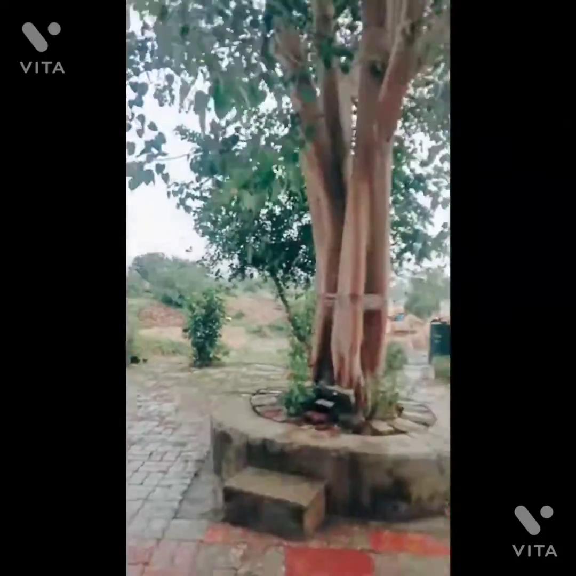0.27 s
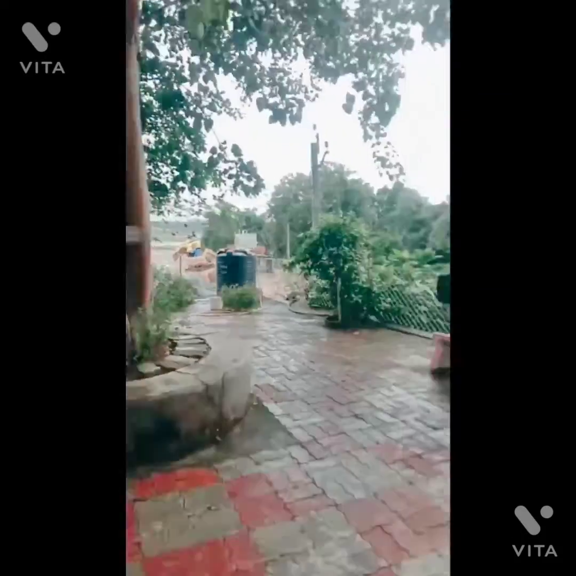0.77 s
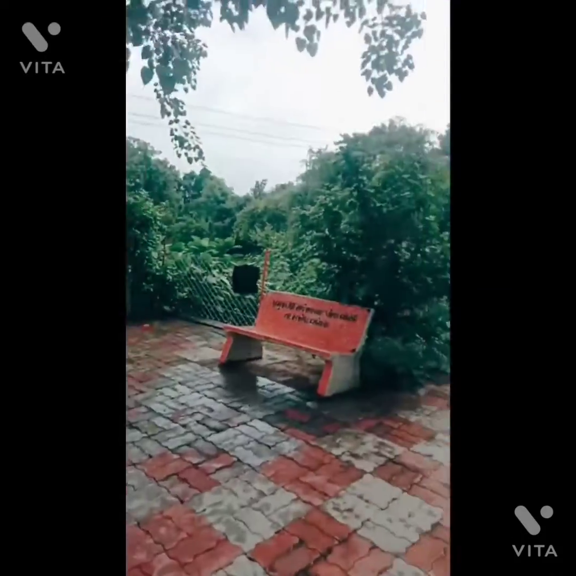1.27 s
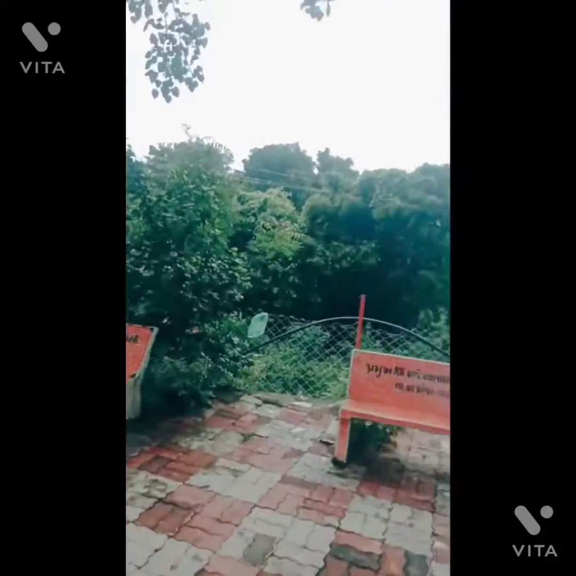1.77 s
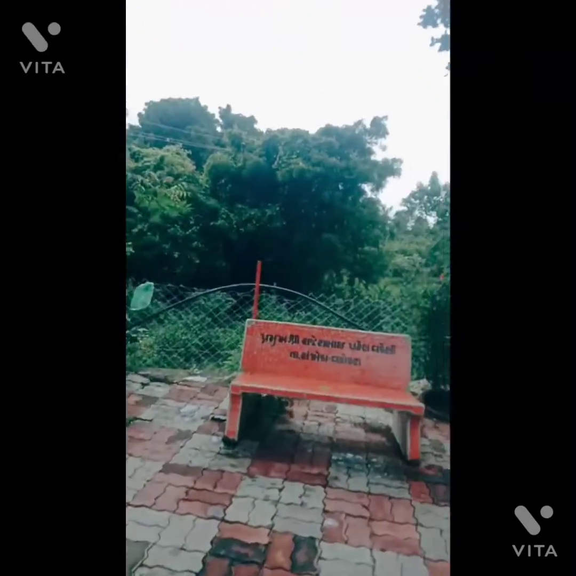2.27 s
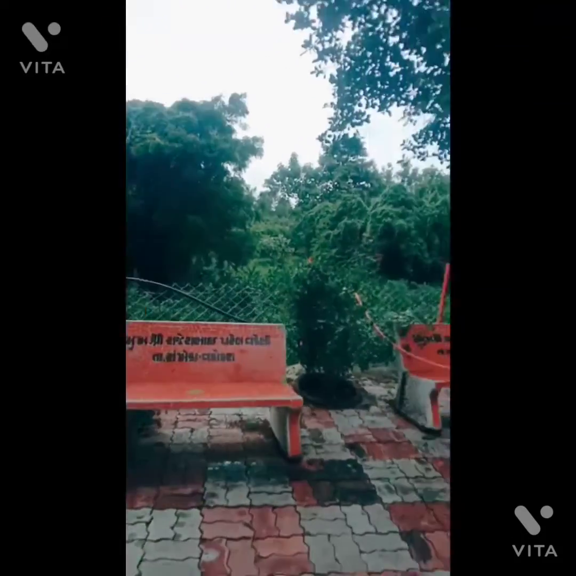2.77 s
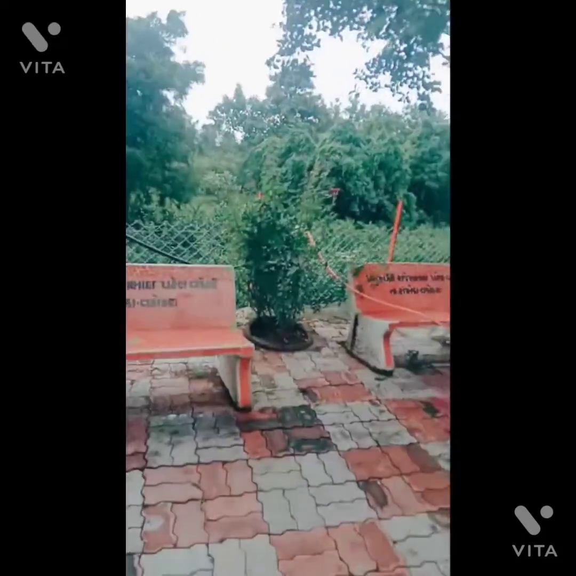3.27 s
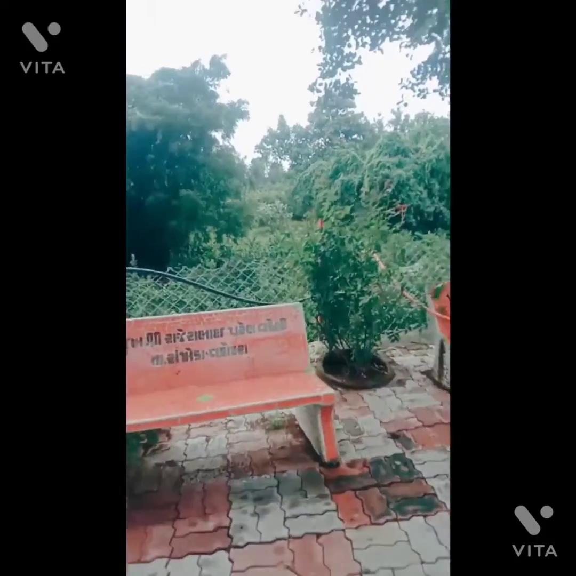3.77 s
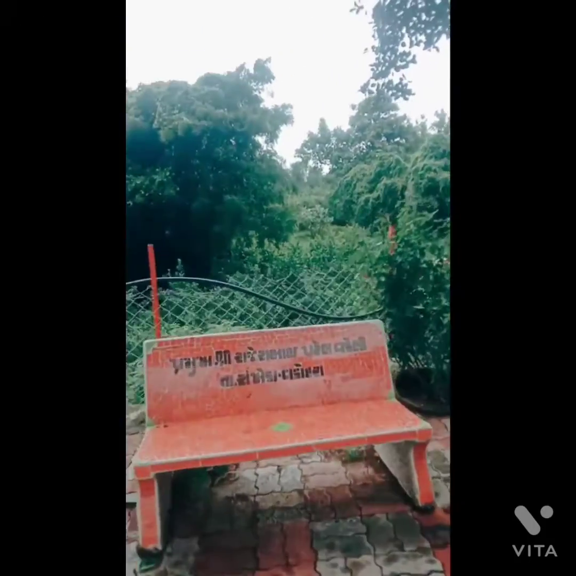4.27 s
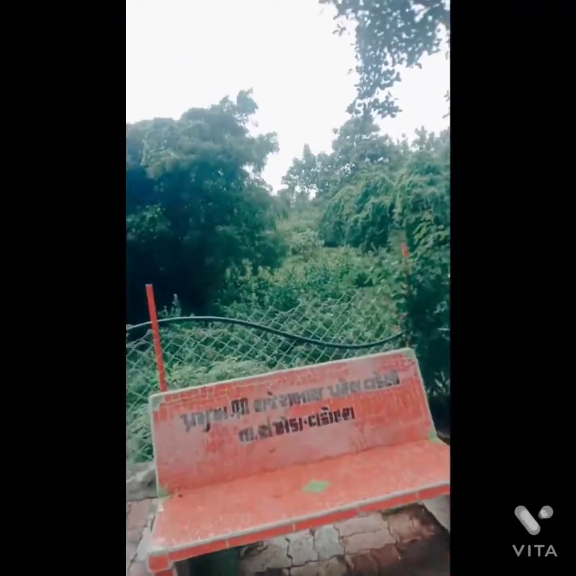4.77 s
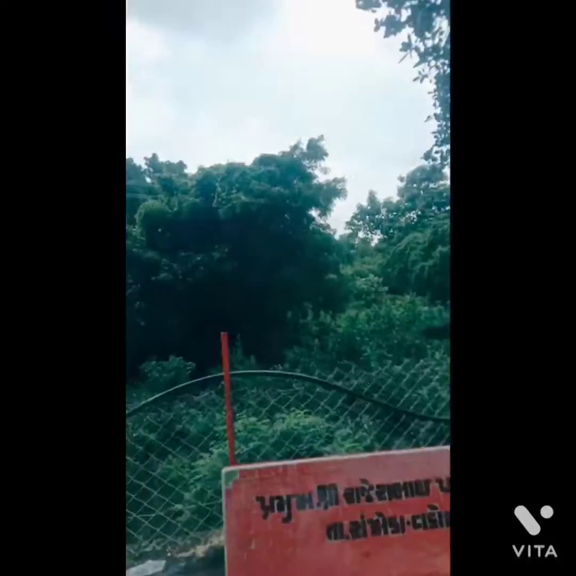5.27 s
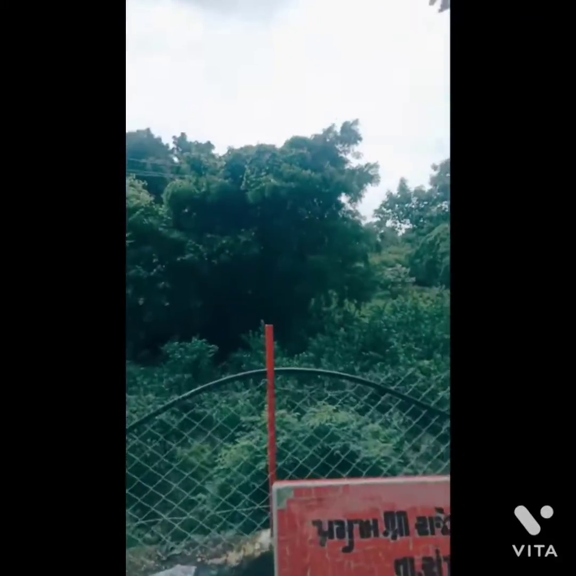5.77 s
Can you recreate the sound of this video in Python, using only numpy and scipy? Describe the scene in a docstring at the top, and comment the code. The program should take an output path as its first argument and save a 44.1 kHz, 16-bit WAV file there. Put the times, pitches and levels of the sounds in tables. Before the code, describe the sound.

A peacock gives five loud, arching cries outdoors, with faint small birds, a few shoe scuffs and light wind behind.

```python
"""Peacock in a paved garden

A peacock gives five loud two-part cries: a low note, a break upward, a long bright arch. Its syrinx buzzes
through throat and beak, and trunks and foliage scatter each cry. Small birds whistle and twitter farther off,
short rough bursts rustle and tick close by, and light wind bumps the microphone over a soft open-air hiss."""
import sys
import numpy as np
from scipy import signal
from scipy.fft import rfft, irfft, next_fast_len
from scipy.io import wavfile
from scipy.ndimage import uniform_filter1d, map_coordinates

SR = 44100
rng = np.random.default_rng(int(sys.argv[2]) if len(sys.argv) > 2 else 0)


def persist_wave(psi):
    """Save psi, clipped to +-1, as 16-bit WAV."""
    counts = np.round(np.clip(psi, -1, 1) * 32767).astype(np.int16)
    wavfile.write(sys.argv[1], SR, np.atleast_2d(counts).T)


N = 265746

# tone of the open-air hiss: freq_hz, gain_db
AIR_EQ = [(120, -43.5), (200, -2.5), (633, -8.5), (741, -8), (980, -10.5), (1270, -0.5), (1460, -9.5),
          (2270, -8.5), (3050, -21), (5720, -13), (6460, -29), (7180, -20), (8260, -35.5), (13000, -36)]
# tone of the wind rumble: freq_hz, gain_db
RUMBLE_EQ = [(12, -60), (20, -30), (64, -12.5), (93, -3.5), (125, -5.5), (179, -10.5), (278, -45.5),
             (400, -49.5), (520, -85.5), (880, -120)]
# eddies bumping the microphone: centre_s, pitch_hz, half_width_s, level_db
WIND_BUMPS = [(0.714, 88, 0.027, -38), (0.926, 92.7, 0.006, -27.5), (1.623, 112, 0.0099, -20),
              (1.691, 74.7, 0.017, -25), (1.847, 86, 0.016, -22.5), (2.25, 87.5, 0.0096, -28.5),
              (2.419, 78.6, 0.0091, -31), (2.84, 109, 0.013, -36)]
# short rough noise bursts, rustles and ticks close by: start_s, length_s, centre_hz, width_octaves, relative_db
RUSTLES = [(.01, .6, 330, .6, -56), (.2, .1, 610, .13, -39), (.205, .19, 5600, .17, -45),
           (.218, .15, 3300, .3, -48), (1.448, .04, 7300, .04, -56), (1.46, .055, 2620, .09, -40),
           (1.675, .05, 2350, .12, -38), (1.772, .025, 2230, .06, -42), (4.526, .05, 5500, .25, -57),
           (4.53, .05, 2500, .38, -49)]
# reverb decay of the far trees: freq_hz, t60_s
TREE_DECAY = [(500, 0.47), (1400, 1), (2400, 1), (3200, 0.7), (5500, 1), (9000, 0.89), (14000, 0.18)]
# tone of the reflections off nearby trunks and leaves: freq_hz, gain_db
FOLIAGE_EQ = [(700, -12.5), (1500, -5), (2500, -0.5), (5500, 3), (9000, -2.5)]
# small birds' whistles: start_s, length_s, start_hz, middle_hz, end_hz, relative_db
BIRD_WHISTLES = [(2.833, 0.36, 4090, 4090, 4120, -65), (2.985, 0.84, 4740, 4705, 4610, -68),
                 (4.251, 0.078, 6200, 5480, 5100, -61), (4.621, 0.16, 4432, 5200, 5060, -57.5),
                 (4.94, 0.058, 4010, 3700, 3260, -59.5), (5, 0.072, 4200, 4030, 3770, -59.5),
                 (5.142, 0.062, 3925, 3630, 3380, -57.5), (5.345, 0.048, 5900, 5832, 5600, -57.5),
                 (5.698, 0.013, 2420, 2740, 2320, -49), (5.992, 0.0225, 3580, 3730, 4100, -52)]
# runs of twittering: start_s, end_s, relative_db
TWITTER_RUNS = [(2.035, 2.28, -53), (5.421, 6.03, -54.5)]
# tone of one chip in a run: freq_hz, gain_db
CHIP_EQ = [(3400, 3), (4000, 3.5), (4400, -13), (4950, 7), (5800, -2.5), (6450, -16.5), (7050, 5),
           (7700, -13)]
# resonances of the peacock's windpipe: freq_hz, gain_db
THROAT_EQ = [(1800, 6), (1950, 7), (2200, 9.5), (2360, -11.5), (2520, 5.5), (3150, -4), (3900, -4.5),
             (4400, -8.5)]
# resonances of its open beak: freq_hz, gain_db
BEAK_EQ = [(4400, -9), (4750, -13.5), (5500, -8.5), (6300, -9), (6900, -16.5), (7900, -16.5), (8700, -25),
           (10300, -29), (12000, -41), (15000, -59.5)]
# voice envelopes through the low note (the wail is the octave, nasal the mid partials, brass the highs):
# position_share, fundamental_db, wail_db, nasal_db, brass_db
LOW_NOTE_SHAPE = [(0, -56.5, -44, -62.5, -65), (.25, -48, -34.5, -45.5, -55.5), (.6, -45.5, -34, -47, -49),
                  (.9, -45.5, -35, -43.5, -52)]
# voice envelopes through the arch: position_share, fundamental_db, wail_db, nasal_db, brass_db
ARCH_SHAPE = [(.04, -39.5, -28.5, -55, -50.5), (.16, -38, -26, -44, -38), (.29, -38, -32, -45.5, -39),
              (.43, -37.5, -29.5, -42.5, -37), (.6, -40.5, -25.5, -44.5, -39.5),
              (.74, -43, -27.5, -54, -46.5), (.87, -44.5, -33, -43, -48), (1, -56.5, -35.5, -41.5, -58)]
# the cries, with trims on those envelopes: start_s, break_s, end_s, low_hz, crest_hz, settle_s,
# low_fundamental_db, arch_fundamental_db, nasal_db, brass_db,
# wail_low_db, wail_rise_db, wail_crest_db, wail_fall_db
PEACOCK_CRIES = [(-.28, -0.153, 0.37, 646, 783.8, .046, 0, -4, -.5, -1.5, 0, 1, -12.5, .5),
                 (0.609, .758, 1.203, 644.8, 788, 0.057, 7, -5, -2, -2, 1.5, 4.5, 0.5, 3),
                 (1.439, 1.614, 2.04, 650.3, 792.3, .038, -4, -1, -0.5, 0.5, 0, -4, 0.5, -3),
                 (2.31, 2.473, 2.953, 652.5, 789.3, 0.051, -0.5, 0, -0.5, 0, -2.5, 1.5, 1.5, 0),
                 (3.344, 3.503, 4.052, 646, 786, 0.047, 7, 2, 0.5, 1, 2, -2, -8.5, -1.5)]


def amp(db):
    """Decibels to gain."""
    return 10 ** (np.asarray(db) / 20)


def unit(x):
    """Scale to rms 1."""
    return x / np.sqrt(np.mean(x ** 2) + 1e-20)


def along(points, hz):
    """Read a curve of (freq_hz, value) points on a log axis."""
    freqs, values = np.transpose(points)
    return np.interp(np.log(hz + 1), np.log(freqs + 1), values)


def wobble(rate, size):
    """Smooth random modulation, rate knots a second."""
    return map_coordinates(rng.standard_normal(int(size * rate / SR) + 4), [np.arange(size) * rate / SR])


def filtered(x, response):
    """Zero-phase EQ; response gives the gain at each frequency."""
    padded = next_fast_len(len(x) + 8192)
    return irfft(rfft(x, padded) * response(np.fft.rfftfreq(padded, 1 / SR)), padded)[:len(x)]


def noise(response, size):
    """Coloured noise of rms 1."""
    return unit(filtered(rng.standard_normal(size), response))


def band(hz, octaves):
    """A bell-shaped response on a log axis."""
    return lambda f: np.exp(-.5 * (np.log2((f + 1) / hz) / octaves) ** 2)


def phase_of(hz):
    """The running phase of a pitch curve, in radians."""
    return 2 * np.pi * np.cumsum(hz) / SR


def add(track, start_s, sound):
    """Mix a sound into the track."""
    part = track[max(round(start_s * SR), 0):][:len(sound)]
    part += sound[:len(part)]


def patchy(x, depth_db):
    """Give a steady noise movement with random gain patches, some 400 Hz by 100 ms."""
    spectrum = signal.stft(x, nperseg=512)[2]
    patches = uniform_filter1d(rng.standard_normal(spectrum.shape), size=5, axis=0)
    patches = uniform_filter1d(patches, size=16, axis=1)
    return unit(signal.istft(spectrum * amp(depth_db * unit(patches)), nperseg=512)[1][:N])


def open_air(hiss_db=-54, drone_db=-61, drone_hz=1260, fizz_db=-77):
    """The bed: softly shifting hiss, a far narrow drone and a faint fizz at the very top."""
    hiss = patchy(noise(lambda f: amp(along(AIR_EQ, f)), N), depth_db=3.5)
    drone = amp(drone_db + 2.1 * wobble(10, N)) * noise(band(drone_hz, .037), N)
    return amp(hiss_db) * hiss + drone + amp(fizz_db) * noise(band(15200, .07), N)


def wind(breeze_db=-50.3, ease_db_per_s=1.55, gust_db=-37.5, gust_s=1.652, hold_s=.18,
         rise_db_per_s=97, fall_db_per_s=26):
    """Lumpy rumble from an easing breeze and one gust; eddies push the diaphragm for a cycle or two."""
    t = np.arange(N) / SR
    breeze = amp(breeze_db - ease_db_per_s * t)
    before, after = np.maximum(gust_s - t, 0), np.maximum(t - gust_s - hold_s, 0)
    gust = amp(gust_db - rise_db_per_s * before - fall_db_per_s * after)
    rumble = noise(lambda f: amp(along(RUMBLE_EQ, f)), N)
    out = np.hypot(breeze, gust) * unit(rumble * amp(3 * wobble(20, N)))
    for centre_s, hz, half_width_s, db in WIND_BUMPS:
        envelope = np.exp(-((t - centre_s) / half_width_s) ** 2)
        out += amp(db) * envelope * np.sin(2 * np.pi * hz * (centre_s - t))
    return out


def rustles(grit_db=3, boost_db=6, fade_db=14):
    """Short rough bursts: gritty rustles that start fast and die away."""
    out = np.zeros(N)
    for start_s, length_s, hz, octaves, db in RUSTLES:
        size = int(length_s * SR)
        grit = unit(noise(band(hz, octaves), size) * amp(grit_db * wobble(297, size)))
        envelope = amp(db + boost_db - fade_db * np.linspace(0, 1, size))
        add(out, start_s, envelope * grit * signal.windows.tukey(size, .2))
    return out


def tree_scatter(x, near_t60_s=.47, far_db=-13, echo_s=.65, echo_db=-27):
    """Near trunks and leaves answer at once, brightly; far trees leave a faint tail and a dull echo."""
    hz, t, spectrum = signal.stft(rng.standard_normal(SR), SR, nperseg=256)
    far = signal.istft(spectrum * amp(-60 * t / along(TREE_DECAY, hz)[:, None]), SR, nperseg=256)[1]
    size = len(far)
    age = np.arange(size) / SR
    far *= np.clip(age / .016, 0, 1) * amp(.48 * wobble(28, size))
    # cubed noise is spiky, like separate reflections
    near = rng.standard_normal(size) ** 3 * amp(-60 * age / near_t60_s) * (age > .008)
    near = filtered(near / np.linalg.norm(near), lambda f: amp(along(FOLIAGE_EQ, f)))
    echo = rng.standard_normal(size) * np.exp(-((age - echo_s) / .012) ** 2)
    echo = filtered(echo / np.linalg.norm(echo), band(1300, .67))
    impulse = near + amp(far_db) * far / np.linalg.norm(far) + amp(echo_db) * echo
    return signal.fftconvolve(x, impulse)[:len(x)]


def whistles(waver=.0058):
    """Each small bird's whistle is one pure tone bent through three pitches."""
    out = np.zeros(N)
    for start_s, length_s, *pitches_hz, db in BIRD_WHISTLES:
        size = int(length_s * SR)
        bend = np.polyval(np.polyfit([0, .5, 1], pitches_hz, 2), np.linspace(0, 1, size))
        hz = bend * (1 + waver * wobble(100, size))
        envelope = amp(db + 1.5 * wobble(30, size)) * signal.windows.tukey(size, .25)
        add(out, start_s, envelope * np.sin(phase_of(hz)))
    return out


def twitter(chips_per_s=11, chip_s=.05, high_hz=7400, low_hz=3700, flutter_db=4):
    """A small bird repeats quick, ragged falling chips, no two alike."""
    out = np.zeros(N)
    size = int(chip_s * SR)
    for start_s, end_s, db in TWITTER_RUNS:
        for onset_s in np.arange(start_s, end_s, 1 / chips_per_s):
            hz = np.linspace(high_hz, low_hz, size) * (1 + .05 * wobble(170, size))
            level = amp(db + along(CHIP_EQ, hz) + flutter_db * wobble(66, size))
            chip = level * np.sin(phase_of(hz)) * signal.windows.tukey(size, .2)
            add(out, onset_s + rng.normal(0, .0013), chip)
    return out


def cry_pitch(t, row, onset_hz=596.5, end_hz=589.5, glide_s=.0073, undershoot_hz=80, waver_hz=1.08):
    """A small hump, a leap that settles on the crest, then a rounded turn into a steady fall."""
    start_s, break_s, end_s, low_hz, crest_hz, settle_s = row[:6]
    hump_at, fall_at, knee = .55, .62, .03815  # shares of the low note, the arch, the arch
    low = onset_hz + (low_hz - onset_hz) * np.sin(np.pi / 2 * (t - start_s) / (break_s - start_s) / hump_at)
    age = np.maximum(t - break_s, 0)
    fall = knee * np.logaddexp(0, (age / (end_s - break_s) - fall_at) / knee) / (1 - fall_at)
    arch = crest_hz - undershoot_hz * np.exp(-age / settle_s) - (crest_hz - end_hz) * fall
    crossfade = (1 + np.tanh((t - break_s) / glide_s)) / 2
    return low + (arch - low) * crossfade + waver_hz * wobble(28.44, len(t))


def cry_envelopes(t, row):
    """Fundamental, wail, nasal and brass levels in dB: shared shapes, stretched and trimmed per cry."""
    start_s, break_s, end_s = row[:3]
    low_db, arch_db, nasal_db, brass_db, *wail_db = row[6:]
    times = [start_s + (break_s - start_s) * stage[0] for stage in LOW_NOTE_SHAPE]
    times += [break_s + (end_s - break_s) * stage[0] for stage in ARCH_SHAPE]
    shapes = np.vstack([LOW_NOTE_SHAPE, ARCH_SHAPE]).T[1:]
    fundamental, wail, nasal, brass = [np.interp(t, times, shape) for shape in shapes]
    fundamental += np.where(t < break_s, low_db, arch_db)
    wail += np.interp((t - break_s) / (end_s - break_s), [0, .07, .54, .59], wail_db)
    return [fundamental, wail, nasal + nasal_db, brass + brass_db]


def cry(row, break_hz=695, break_width_hz=52, rasp_db=-50, flutter_db=3, reedy_db=2, spent_db=-5,
        hoarse_db=-6, hoarse_hz=2250, attack_s=.014, release_s=.012):
    """The syrinx buzzes through throat and beak, clean on held notes, rough between registers."""
    t = np.arange(row[0], row[2], 1 / SR)
    size = len(t)
    curves = [cry_pitch(t, row)] + cry_envelopes(t, row)
    pitch, fundamental_db, wail_db, nasal_db, brass_db = uniform_filter1d(curves, size=700, axis=1)
    # the voice cracks on the way up through the break, and stays cracked once it falls back to it
    offset = (pitch - break_hz) / break_width_hz
    falling = t > t[np.argmax(pitch)]
    cracked = np.exp(-np.where(falling, np.maximum(offset, 0), offset) ** 4)
    low_note = ~falling * np.clip(-offset, 0, 1)
    jitter = (.0006 + .007 * cracked) * wobble(200, size)
    phase = phase_of(pitch * (1 + jitter))

    def overtone_db(hz):
        """Throat colour below 4 kHz, beak colour above; the very top opens only at full effort."""
        throat = nasal_db + spent_db * falling * cracked + along(THROAT_EQ, hz)
        dulling = 2.12 * np.clip(hz / 6500 - 1, 0, 1) * (brass_db - brass_db.max())
        beak = brass_db + reedy_db * low_note + along(BEAK_EQ, hz) + dulling
        return throat + (beak - throat) * np.clip((hz - 4000) / 600, 0, 1)

    voice = np.zeros(size)
    levels_db = [fundamental_db, wail_db] + [overtone_db(k * pitch) for k in range(3, 20)]
    for k, db in enumerate(levels_db, 1):
        # uneven cycles spread a skirt of noise round every partial, more so round the high ones
        skirt = amp(rasp_db) * k + .17 * cracked * (k - 1) ** 1.5 / 3
        partial = np.sin(k * phase) * (1 + skirt * wobble(500, size))
        partial += np.cos(k * phase) * skirt * wobble(500, size)
        makeup = np.sqrt(2 / (1 + 2 * skirt ** 2))
        voice += makeup * amp(db + flutter_db * wobble(45.51, size)) * partial
    # a hoarse rush flares at the upward break and clears as the arch settles
    since_break = t - t[np.argmax(pitch > break_hz)]
    flare = np.exp(-np.abs(since_break) / np.where(since_break < 0, .02, .14))
    voice += amp(nasal_db + hoarse_db) * (.05 + flare) * noise(band(hoarse_hz, .24), size)
    return voice * np.clip((t - t[0]) / attack_s, 0, 1) * np.clip((t[-1] - t) / release_s, 0, 1)


def peacock(preroll_s=.3, direct_treble_db=-3):
    """Five cries, the first already under way; the mic moves, so each finds new paths through trees."""
    preroll = round(preroll_s * SR)
    out = np.zeros(preroll + N)
    for row in PEACOCK_CRIES:
        call = np.zeros(preroll + N)
        add(call, preroll_s + row[0], cry(row))
        # what the leaves scatter is lost from the direct sound
        direct = filtered(call, lambda f: amp(along([(1600, .018), (5000, direct_treble_db)], f)))
        out += direct + tree_scatter(call)
    return out[preroll:]


def scene(bird_gain=1.157):
    """Mono mix: the peacock up front, small birds deeper in the trees, rustles, wind and air beneath."""
    birds = whistles() + twitter()
    birds = bird_gain * (birds + tree_scatter(birds))
    return (peacock() + birds + rustles() + wind() + open_air())[None]


def record(dry, top_hz=15600):
    """The phone's band limit: a brick-wall low-pass."""
    return np.array([filtered(channel, lambda hz: hz < top_hz) for channel in dry])


dry = scene()
out = record(dry)
persist_wave(out)
```